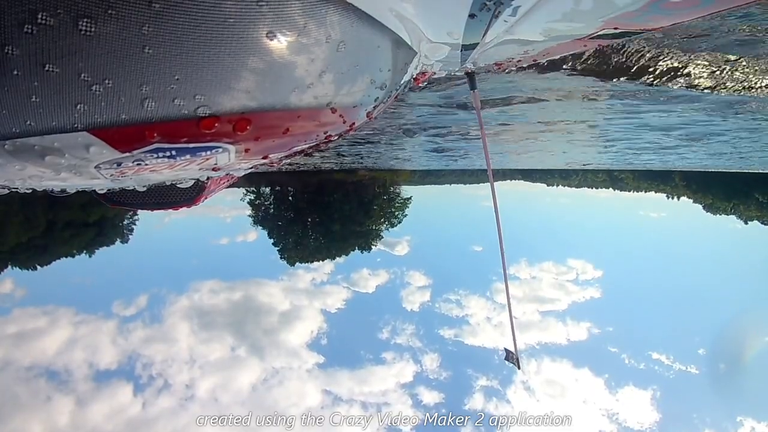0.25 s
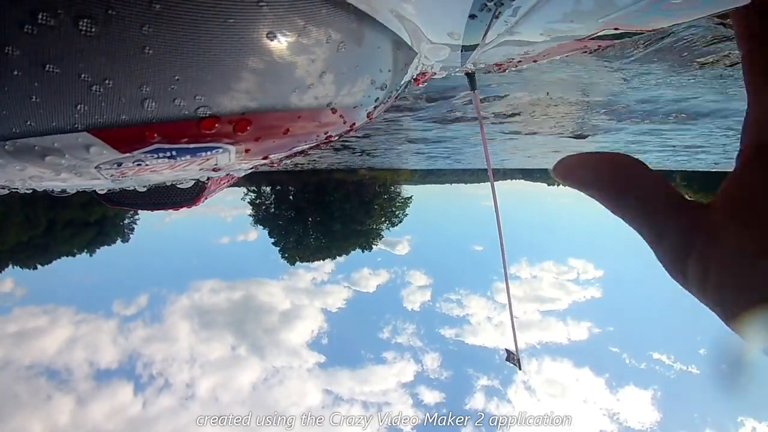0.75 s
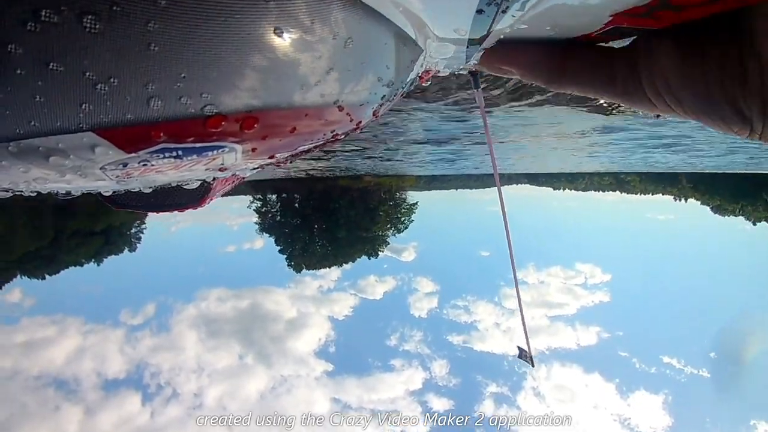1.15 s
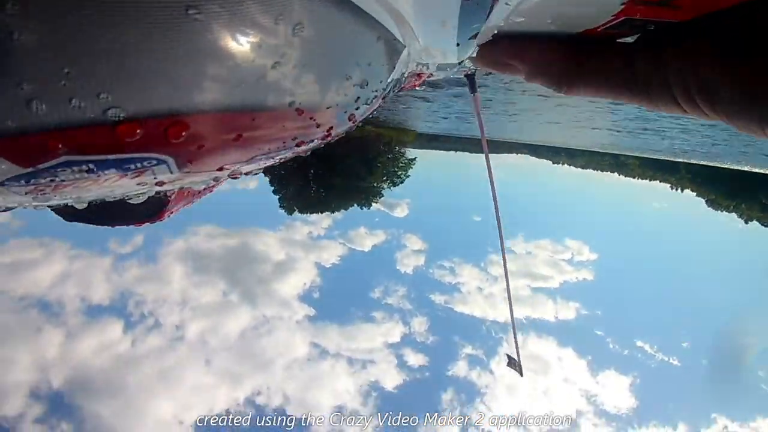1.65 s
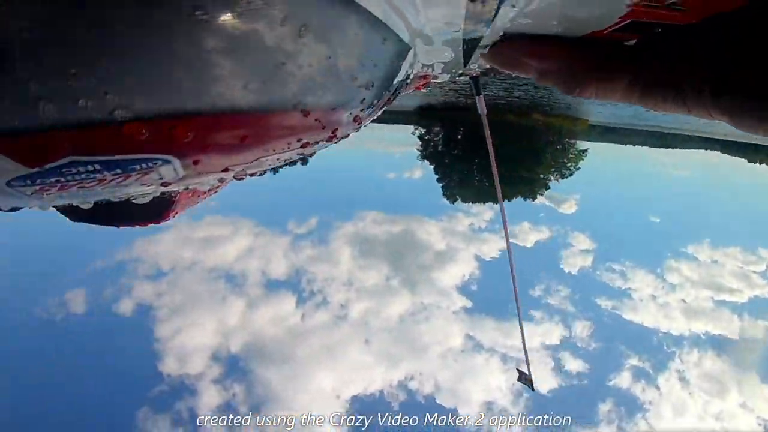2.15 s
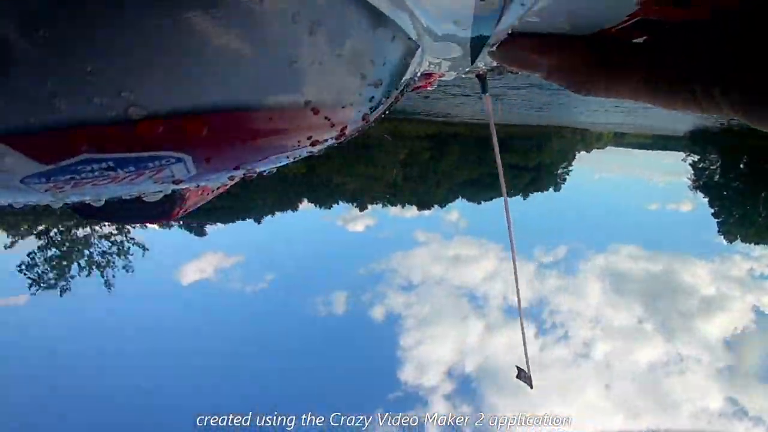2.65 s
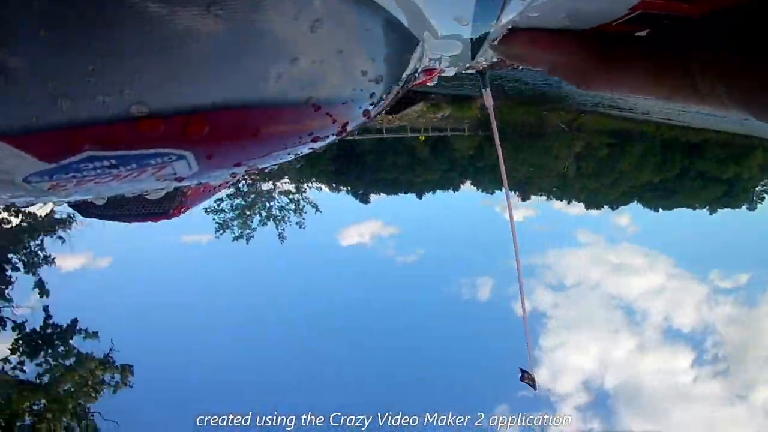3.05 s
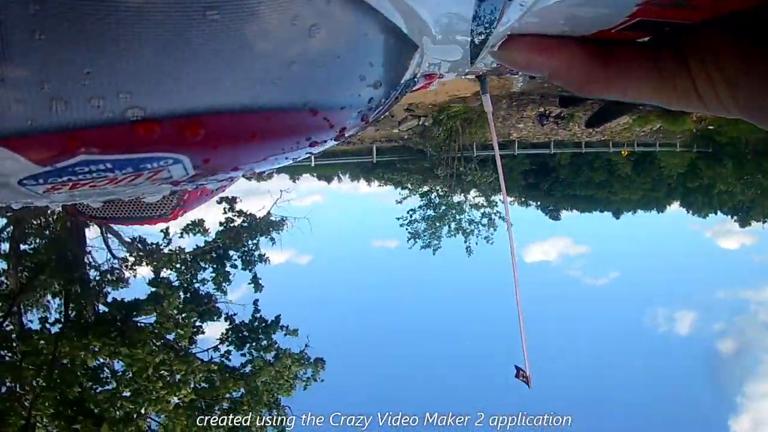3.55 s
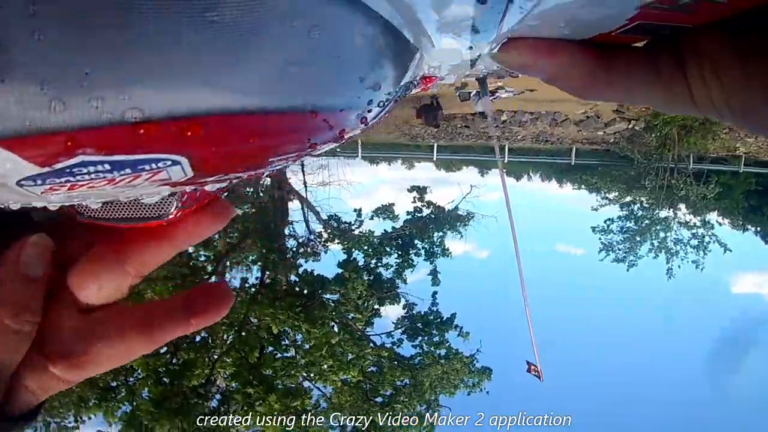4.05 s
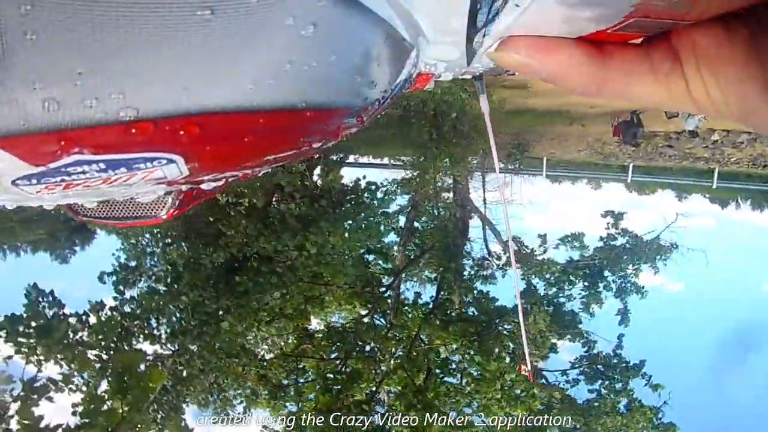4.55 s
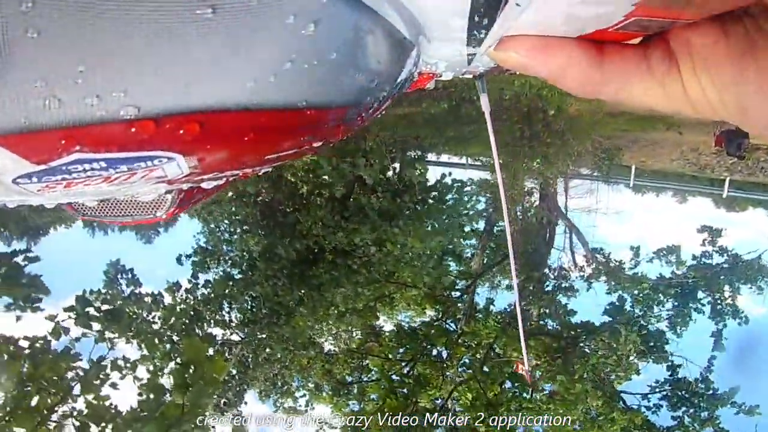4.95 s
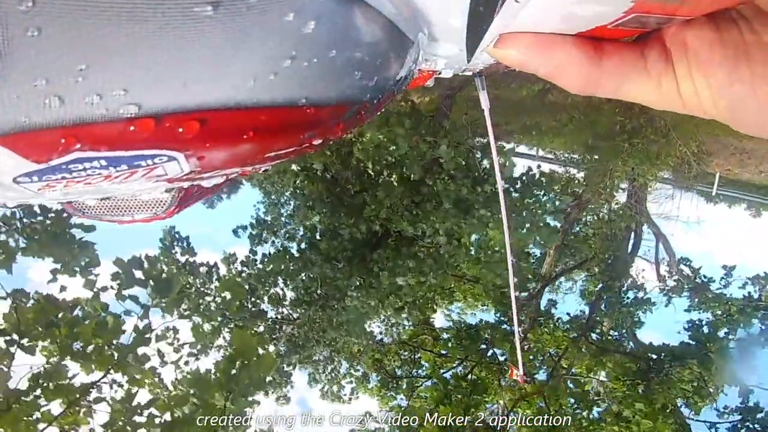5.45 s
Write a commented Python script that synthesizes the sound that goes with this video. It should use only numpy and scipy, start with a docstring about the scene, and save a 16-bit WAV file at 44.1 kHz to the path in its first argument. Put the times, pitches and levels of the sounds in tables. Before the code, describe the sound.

Close, muffled sound from a microphone sealed in a plastic case on a small boat's hull. Water slaps, gulps and gurgles with hard knocks, building to a surging, crackling hand slide just after one second. One heavy bump follows near two seconds, then drips, sparse taps and low sway over faint steady wash, ending in a cluster of dull clunks.

```python
"""Handling a small model boat, heard from its hull

The microphone sits in a camera in a waterproof case on the hull: water slaps, gulps and gurgles (ringing air
pockets) and a hand slides over it (surging, crackling friction). The case knocks and the loose camera clunks
(ringing modes) while the hollow hull booms and sways (low modes), over a steady muffled wash (shaped noise)."""
import sys
import numpy as np
from scipy import signal
from scipy.fft import rfft, irfft, next_fast_len
from scipy.io import wavfile
from scipy.ndimage import uniform_filter1d

SR = 44100
rng = np.random.default_rng(int(sys.argv[2]) if len(sys.argv) > 2 else 0)


def dump(signal):
    """Clip the signal to [-1, 1] and save it as 16-bit WAV at the path in sys.argv[1]."""
    limited = np.clip(np.atleast_2d(signal).T, -1, 1)
    pcm = np.round(limited * 32767).astype(np.int16)
    wavfile.write(sys.argv[1], SR, pcm)


N = 251361
TIME = np.arange(N) / SR
PADDED = next_fast_len(N, True)
FREQ = np.fft.rfftfreq(PADDED, 1 / SR)

# The case knocks on the hull. Each row: start in seconds, level in dB, hardness as a tilt in dB per octave.
KNOCK_ROWS = [(0.4274, -41, -2.5), (0.4585, -31.5, -10), (0.848, -33.5, 1.5), (0.861, -35.5, -2),
              (0.9125, -40, -0.5), (0.991, -42, 2), (1.132, -31.5, 0.5), (1.156, -32.5, -5.5),
              (1.237, -26.5, -1.5), (1.2545, -29.5, -2), (1.269, -34.5, 0), (1.3085, -38, 1.5),
              (1.371, -30, -2), (1.381, -33, 2), (2.0461, -43, -1), (2.0765, -37.5, 0.5),
              (2.2216, -51.5, 3), (2.564, -67, 18), (2.6015, -45, 0.5), (3.1455, -34, 1),
              (3.8835, -35, 0.5), (3.889, -36, -1), (4.078, -43, 0.5), (4.173, -45, -0.5),
              (5.6198, -42, 0.5)]
# The loose camera rocks in its mount. Each row: start in seconds, relative level in dB, hardness as a tilt
# in dB per octave.
CLUNK_ROWS = [(3.0018, -40.5, -2), (3.0411, -42, 0), (3.137, -31.5, 0), (4.828, -40.5, -4.5),
              (4.868, -50, -14), (5.0205, -44.5, -1), (5.1559, -50, -6), (5.2903, -36, -4), (5.302, -34, 1),
              (5.321, -44, 1), (5.33, -39.5, 0.5), (5.403, -37, -1), (5.455, -35.5, -8), (5.49, -44.5, -18),
              (5.5737, -37, -3)]
# Ringing of the plastic case. Each row: pitch in Hz, relative level in dB, time to fall 60 dB in seconds.
CASE_MODES = [(266, 7, 0.01), (529.5, 5, 0.038), (711, -5, 0.097), (910, 12.5, 0.0065), (1142, -6.5, 0.12),
              (1489, 7.5, 0.02), (1500, -19, 0.045), (2070, -22, 0.085), (1930, -20.5, 0.021),
              (2420, -36, 0.0031), (3485, -5.5, 0.017), (3950, 5, 0.0027), (3830, -45.5, 0.013),
              (5040, -39, 0.022), (6400, -39, 0.013)]
# Ringing of the hollow hull. Each row: pitch in Hz, relative level in dB, time to fall 60 dB in seconds.
HULL_MODES = [(36.5, 4.5, 0.59), (71.5, 6, 0.31), (108.1, 6.5, 0.2), (130.4, -3.5, 0.27), (179, -7.5, 0.46)]


def amp(db):
    """Decibels to gain."""
    return 10 ** (np.asarray(db) / 20)


def evened(x):
    """Scales to rms 1."""
    return x / np.sqrt(np.mean(x ** 2) + 1e-20)


def crested(x, size):
    """Scales so that the loudest stretch of that many samples has rms 1."""
    return x / np.sqrt(uniform_filter1d(x ** 2, size, mode="constant").max() + 1e-20)


def read(points, hz):
    """Reads a spectrum on a log-frequency axis."""
    f, value = np.transpose(points)
    return np.interp(np.log(hz + 1), np.log(f + 1), value)


def octaves(hz):
    """Octaves from 1 kHz, held below 300 Hz and above 6500 Hz."""
    return np.log2(np.clip(hz, 300, 6500) / 1000)


def coloured(x, db):
    """Filters by a gain given at every frequency."""
    return irfft(rfft(x, PADDED) * amp(db), PADDED)[:N]


def wander(hz):
    """Slow chance of rms 1, fading out smoothly around and above hz."""
    spectrum = rfft(rng.standard_normal(PADDED)) * np.exp(-np.minimum(FREQ / hz, 10) ** 2)
    return evened(irfft(spectrum, PADDED)[:N])


def add(mix, s, sound):
    """Mixes a sound in at a time in seconds."""
    part = mix[max(round(s * SR), 0):][:len(sound)]
    part += sound[:len(part)]


def ring(modes, t, gain_db=0, detune=1):
    """Sum of dying sines, one for each mode."""
    hz, db, t60 = np.transpose(modes)
    sines = np.sin(2 * np.pi * (hz * detune)[:, None] * t)
    return amp(db + gain_db) @ (amp(-60 * t / t60[:, None]) * sines)


def sized_births(per_s, size_db, limit):
    """Chance starts at a mean rate, with levels spread upwards as far as size_db * limit."""
    return (rng.random(N) < per_s / SR) * amp(size_db * np.minimum(rng.exponential(1, N), limit))


def pockets(rows, level_db, rise_s, octaves_per_s):
    """Trapped air rings, rising in pitch as its pocket shrinks or falling as it opens."""
    out, t = np.zeros(N), np.arange(SR // 4) / SR
    for s, db, hz, t60 in rows:
        phase = 2 * np.pi * np.cumsum(hz * 2 ** (octaves_per_s * t)) / SR
        pocket = -np.sin(phase) * amp(-60 * t / t60)
        add(out, s, amp(db + level_db) * pocket * (1 - np.exp(-t / rise_s)))
    return out


def slaps():
    """Water slaps the wet hull, each slap ringing a hollow pocket of air that shrinks."""
    # Each row: start in seconds, relative level in dB, starting pitch in Hz, time to fall 60 dB in seconds.
    slap_rows = [(0.427, -20, 540, 0.043), (0.43, -32.5, 756, 0.029), (0.449, -26.5, 570, 0.018),
                 (0.535, -44, 430, 0.063), (0.831, -43, 938, 0.074), (0.857, -37, 620, 0.05),
                 (1.032, -34.5, 525, 0.042), (1.073, -37, 450, 0.078), (1.131, -15.5, 518, 0.029),
                 (1.152, -35, 1126, 0.05), (1.16, -26, 530, 0.055), (1.194, -32, 595, 0.05),
                 (1.8975, -34.5, 440, 0.06), (1.8975, -10.5, 309, 0.012), (3.884, -29, 607, 0.044),
                 (4.077, -36.5, 960, 0.022), (4.173, -44, 940, 0.045), (4.186, -46, 704, 0.038),
                 (4.866, -47.5, 317, 0.042), (5.021, -43.5, 490, 0.033), (5.302, -32, 890, 0.021),
                 (5.403, -39, 560, 0.03)]
    return pockets(slap_rows, level_db=-1.5, rise_s=0.00069, octaves_per_s=1.9)


def gulps():
    """Water gulps under the hull, falling in pitch as the hollow opens."""
    # Each row: start in seconds, relative level in dB, starting pitch in Hz, time to fall 60 dB in seconds.
    gulp_rows = [(0.425, -40.5, 127.6, 0.7), (0.463, -42, 228, 0.092), (0.843, -33, 252, 0.17),
                 (0.85, -29, 126, 0.2), (0.887, -31, 200, 0.16), (0.925, -40.5, 297, 0.1),
                 (1.085, -39, 193.3, 0.13), (1.135, -25, 174, 0.11), (1.19, -33.5, 218, 0.12),
                 (3.149, -24.5, 189, 0.076), (4.085, -46, 114, 0.15), (4.118, -41.5, 193.2, 0.31),
                 (5.52, -42, 251, 0.094)]
    return pockets(gulp_rows, level_db=0.5, rise_s=0.0022, octaves_per_s=-5)


def bump(rub, splash_db=-27, splash_s=0.0095, hiss_db=-46, hiss_s=0.009):
    """The hull lands squarely on the case: a steep push relaxes at once, with a short noisy splash."""
    start_s, level_db, contact_s, top_hz = 1.8975, -12.5, 0.00102, 2200
    t = np.arange(SR // 16) / SR
    push = signal.lfilter(*signal.butter(5, top_hz, fs=SR), np.exp(-t / contact_s))
    splash = amp(splash_db) * evened(rub[:SR // 16]) * np.exp(-t / splash_s)
    hiss = amp(hiss_db) * rng.standard_normal(len(t)) * np.exp(-t / hiss_s)  # faint treble noise
    out = np.zeros(N)
    add(out, start_s, amp(level_db) * (splash + hiss - push))
    return out


def knocks(blows, modes, level_db=0, spread_db=4.5, detune=0.048, crack_db=-4, soft_hz=2600,
           dent_db=-2, dent_s=0.001):
    """Each blow rings the modes, a little differently by where it lands, with a brief gritty crack."""
    grit_db, crack_s, crack_hz = 0.1, 0.0027, 1800
    hiss_db, hiss_s = -42, 0.019
    crest = 176  # samples, 4 ms
    out, t = np.zeros(N), np.arange(SR // 8) / SR
    hz = np.transpose(modes)[0]
    wall = signal.butter(8, 7200, fs=SR, output="sos")  # the case lets little top treble through
    for s, db, tilt in blows:
        place, shift = rng.standard_normal((2, len(hz)))
        grit, noise = rng.standard_normal((2, len(t)))
        body = ring(modes, t, tilt * octaves(hz) + spread_db * place, 1 + detune * shift)
        # a hard blow cracks louder and brighter
        crack_band = [380, np.clip(crack_hz * amp(tilt), 1300, 6500)]
        crack_filter = signal.butter(4, crack_band, "band", fs=SR, output="sos")
        crack = signal.sosfilt(crack_filter, grit * np.sqrt(t) * np.exp(-t / crack_s))
        # the wall dents once and springs back
        dent = (1 - t / (3 * dent_s)) * t * np.exp(-t / dent_s)
        blow = crested(body, crest) + amp(crack_db + grit_db * tilt) * crested(crack, crest)
        blow = blow + amp(dent_db) * crested(dent, crest)
        # a soft blow leaves out the treble
        soft = signal.butter(3, np.clip(soft_hz * amp(tilt), 1400, 6500), fs=SR)
        blow = signal.lfilter(*soft, signal.sosfilt(wall, blow))
        # faint treble noise around the blow
        hiss = amp(hiss_db) * noise * np.sqrt(t / hiss_s) * np.exp(-t / hiss_s)
        add(out, s, amp(db + level_db) * (hiss - crested(blow, crest)))
    return out


def clunks():
    """The loose camera rocks in its mount, each dull blow ringing the mount's modes."""
    # Each row: pitch in Hz, relative level in dB, time to fall 60 dB in seconds.
    mount_modes = [(532, 5, 0.033), (760, 0.5, 0.015), (922, 7, 0.011), (1130, -7, 0.018),
                   (1410, -10.5, 0.059)]
    return knocks(CLUNK_ROWS, mount_modes, level_db=-6, spread_db=5.5, detune=0.033, crack_db=-8.5,
                  soft_hz=1910, dent_db=-10, dent_s=0.0017)


def friction(slips_per_s=2500, size_db=3, catch_hz=160, catch_db=1.6, smooth=0.59, ring_share=0.32):
    """Tiny slips and drops come in clumps and sound through the case."""
    # Colour of rubbing. Each row: frequency in Hz, relative level in dB per Hz.
    rub_colour = [(150, -32), (260, -11), (520, 2.5), (750, -9), (950, -1.5), (1220, -23.5), (1550, 0.5),
                  (1900, -2.5), (2500, -16), (2900, -29), (3400, -18.5), (4200, -17.5), (4900, -30),
                  (6500, -33), (7600, -49), (15000, -53)]
    slips = sized_births(slips_per_s, size_db, 4) * rng.choice([-1, 1], N)
    drive = evened(slips) + smooth * rng.standard_normal(N)
    drive = drive * amp(catch_db * wander(catch_hz))
    case_ring = np.diff(ring(CASE_MODES, np.arange(SR // 8) / SR))
    ringing = signal.fftconvolve(drive, case_ring)[:N]
    ringing = signal.lfilter(*signal.butter(2, 2200, fs=SR), ringing)
    return evened(coloured(drive, read(rub_colour, FREQ))) + ring_share * evened(ringing)


def judder(rub, per_s=72, jitter=0.3, fade_s=0.019, spread_db=3, steady=0.9, wall_hz=5200, groan_db=1.5):
    """Wet skin sticks and slips unevenly: gives the bursts of rubbing and a resonant groan."""
    # Broad resonances that colour the slide. Each row: pitch in Hz, relative level in dB, time to fall
    # 60 dB in seconds.
    slide_modes = [(199, 2.5, 0.35), (405, -13, 0.14), (537, 5.5, 0.093), (1470, -11, 0.06),
                   (1624, -15, 0.06), (1860, -1.5, 0.068), (2020, 6, 0.042)]
    t = np.arange(SR // 4) / SR
    turns = np.cumsum(per_s * np.exp(jitter * wander(60))) / SR
    slips = np.diff(np.floor(turns), prepend=0) * amp(spread_db * rng.standard_normal(N))
    bursts = steady + signal.fftconvolve(slips, np.exp(-t / fade_s))[:N]
    groan = signal.fftconvolve(bursts * rng.standard_normal(N), ring(slide_modes, t))[:N]
    wall = signal.butter(3, wall_hz, fs=SR)  # the case dulls the slips
    return signal.lfilter(*wall, rub * bursts), amp(groan_db) * evened(groan)


def crackle(per_s=520, low_hz=1300, high_hz=4300, cycles=7, size_db=3, tilt=-7, count=24):
    """The squeezed film of water bursts in separate little pops at a spread of pitches."""
    out, t = np.zeros(N), np.arange(SR // 40) / SR
    for hz in np.geomspace(low_hz, high_hz, count):
        pops = sized_births(per_s / count, size_db, 2)
        pop = np.sin(2 * np.pi * hz * t) * np.exp(-hz * t / cycles) * (1 - np.exp(-hz * t))
        out += amp(tilt * octaves(hz)) * signal.oaconvolve(pops, pop)[:N]
    return evened(out)


def slide(rub, crackle_db=-8.0):
    """The hand closes on the hull in one long surging slide, brighter as the grip tightens, then rests."""
    start_s, end_s, attack_s, release_db_per_s = 1.228, 1.3946, 0.0062, 600
    level_db, tilt_start, tilt_end = -39.5, 0.39, 3.5  # tilts in dB per octave
    # Surges of the hand. Each row: time in seconds, pressure in dB.
    surge_rows = [(1.232, 2), (1.26, -0.5), (1.276, -5), (1.292, 4), (1.302, -0.5), (1.314, 3.5),
                  (1.326, 1), (1.342, 3), (1.364, -1.5), (1.383, 1), (1.4, -0.5)]
    bursts, groan = judder(rub)
    dull = evened(coloured(bursts, tilt_start * octaves(FREQ)))
    bright = evened(coloured(bursts, tilt_end * octaves(FREQ)))
    grip = np.clip((TIME - start_s) / (end_s - start_s), 0, 1)
    attack = np.clip((TIME - start_s) / attack_s, 0, 1)
    release_db = release_db_per_s * np.clip(TIME - end_s, 0, 1)
    pressure_db = np.interp(TIME, *np.transpose(surge_rows))
    wet = (1 - grip) * dull + grip * bright + groan + amp(crackle_db) * crackle()
    return wet * attack * amp(level_db + pressure_db - release_db)


def strokes(rub, level_db=-1, edge_s=0.015, taper=0.11):
    """Water and fingers slide on the hull in short stretches, each of its own strength and brightness."""
    # Each row: start in seconds, end in seconds, relative level in dB, tilt in dB per octave.
    stroke_rows = [(0.409, 0.469, -46, -6), (0.463, 0.567, -58, 0), (0.555, 0.679, -53, -3),
                   (0.71, 0.751, -60, -1), (0.737, 0.884, -51.5, -4.5), (0.824, 0.875, -48, 1.5),
                   (0.992, 1.015, -51.5, 2.5), (0.999, 1.136, -52.5, -0.5), (1.07, 1.116, -68.5, 13),
                   (1.097, 1.255, -51, -1), (1.405, 1.441, -48.5, 0.5), (1.731, 1.829, -56, -2.5),
                   (2.053, 2.126, -58, -0.5), (2.217, 2.227, -50.5, 6), (2.491, 2.552, -65, 4.5),
                   (2.594, 2.623, -53.5, 2.5), (2.888, 2.969, -66, -0.5), (3.146, 3.18, -49.5, -3),
                   (3.876, 3.901, -45.5, -0.5), (3.956, 4.22, -61, -1.5), (4.397, 4.464, -58, -9),
                   (5.28, 5.353, -67.5, 4.5)]
    out = np.zeros(N)
    for start, end, db, tilt in stroke_rows:
        part = rub[round(start * SR):][:max(round((end - start) * SR), 256)]
        part = part * signal.windows.tukey(len(part), taper + 2 * edge_s * SR / len(part))
        tilt_db = tilt * octaves(np.fft.rfftfreq(len(part), 1 / SR))
        part = irfft(rfft(part) * amp(tilt_db), len(part))
        add(out, start, amp(db + level_db) * evened(part))
    return out


def booms(blows, spread_octaves=0.2):
    """Each blow makes the nearest panel boom, then the whole hull give, as pushes for thuds()."""
    # Panel, then hull. Each row: delay in seconds, level against the blow in dB, central pitch in Hz.
    boom_rows = [(0.003, -2.5, 167.6), (0.009, -1.5, 86.2)]
    db_per_hardness = 0.9  # raises hard blows, lowers soft ones
    limit_db = -42  # the stiff hull is pushed no harder than this
    pushes = []
    for s, db, tilt in blows:
        weight_db = db + db_per_hardness * tilt
        places = 2 ** (spread_octaves * rng.standard_normal(2))  # pitch depends on where the blow lands
        for (delay_s, boom_db, hz), place in zip(boom_rows, places):
            pushes.append((s + delay_s, min(weight_db + boom_db, limit_db), hz * place))
    return pushes


def thuds(level_db=-1, cycles=2.5, ring_db=-8, reach=0.34):
    """A push flexes the hull for a cycle or two and leaves the nearest modes ringing."""
    # Further low pushes on the hull, alone or under a blow. Each row: start in seconds, relative level in dB,
    # pitch in Hz.
    thud_rows = [(0.923, -29, 78.5), (1.07, -30, 55.7), (1.223, -24, 71), (1.25, -37, 194),
                 (1.305, -24, 70), (1.452, -34, 130), (1.736, -34.5, 61.7), (1.8995, -25.5, 182),
                 (1.903, -32.5, 62.3), (2.922, -41, 56.6), (3.05, -41, 80), (3.155, -31.5, 48.5),
                 (3.888, -33, 111), (4.049, -37.5, 39.4), (4.479, -37, 126), (4.875, -41.5, 70),
                 (5.03, -42.5, 64), (5.305, -38.5, 37), (5.338, -42, 114), (5.467, -38, 80.3)]
    out, t = np.zeros(N), np.arange(SR // 2) / SR
    mode_hz = np.transpose(HULL_MODES)[0]
    for s, db, hz in [*thud_rows, *booms([*KNOCK_ROWS, *CLUNK_ROWS])]:
        flex = np.sin(2 * np.pi * hz * t) * np.exp(-hz * t / cycles)
        tail = ring(HULL_MODES, t, -6 * abs(np.log2(mode_hz / hz)) / reach)
        push = (flex + amp(ring_db) * tail) * (1 - np.exp(-5 * hz * t))
        add(out, s, amp(db + level_db) * crested(push, size=440))
    return out


def sway(flex_hz=35, top_hz=230, lump_db=2):
    """Uneven pressure of water and hand keeps the hull flexing and rumbling in its modes."""
    # The hull shakes. Each row: time in seconds, slow flexing in dB, ringing in dB.
    sway_rows = [(0.0, -62, -60.5), (0.24, -61.5, -63), (0.83, -74, -48.5), (1.06, -39.5, -41),
                 (1.269, -37.5, -32.5), (1.48, -54.5, -60), (1.73, -56.5, -55), (1.92, -42.5, -42.5),
                 (2.13, -48, -47), (2.3, -48.5, -53), (2.68, -54.5, -58.5), (2.97, -51, -54),
                 (3.13, -52, -47.5), (3.26, -51.5, -57.5), (3.87, -56, -59.5), (4.05, -43.5, -47),
                 (4.46, -49, -57.5), (5.7, -46.5, -48)]
    s, flexing_db, ringing_db = np.transpose(sway_rows)
    hull_ring = np.diff(ring(HULL_MODES, np.arange(SR // 2) / SR))
    rumble = signal.fftconvolve(rng.standard_normal(N), hull_ring)[:N]
    rumble = signal.lfilter(*signal.butter(2, top_hz, fs=SR), rumble)
    rumble = evened(rumble * amp(lump_db * wander(16)))
    flex_band = signal.butter(2, [17, flex_hz], "band", fs=SR, output="sos")
    flex = evened(signal.sosfilt(flex_band, rng.standard_normal(N)))
    return rumble * amp(np.interp(TIME, s, ringing_db)) + flex * amp(np.interp(TIME, s, flexing_db))


def gurgle(level_db=-1, per_s=200, low_hz=380, high_hz=1400, cycles=5, glide=3, size_db=3, count=24):
    """Many small pockets of air ring for a few cycles, rising in pitch; the small ones are fainter."""
    # Water gurgling along the hull. Each row: time in seconds, relative level in dB.
    gurgle_rows = [(0.38, -65), (0.44, -44), (0.49, -57), (0.65, -58), (0.72, -80), (0.84, -42),
                   (0.89, -55.5), (1.1, -51), (1.17, -43), (1.39, -44), (1.45, -61)]
    out, t = np.zeros(N), np.arange(SR // 16) / SR
    for hz in np.geomspace(low_hz, high_hz, count):
        births = sized_births(per_s / count, size_db, 3)
        bubble = np.sin(2 * np.pi * hz * t * (1 + glide * t)) * np.exp(-hz * t / cycles)
        bubble = bubble * (1 - np.exp(-hz * t)) ** 2
        out += signal.oaconvolve(births, bubble)[:N] / np.sqrt(hz)
    course_db = np.interp(TIME, *np.transpose(gurgle_rows), left=-120, right=-120)
    return evened(out) * amp(level_db + course_db)


def drips(rub, ring_s=0.035, splash_db=-9, splash_s=0.0044):
    """Drops land near the case, each with a brief splash and one small ringing bubble."""
    # Each row: start in seconds, relative level in dB, starting pitch in Hz.
    drip_rows = [(0.585, -50, 1130), (0.616, -49.5, 1840), (0.652, -54, 592), (0.667, -45.5, 1414),
                 (0.797, -62, 1060), (2.002, -50.5, 770), (2.025, -58.5, 735), (2.099, -56, 910),
                 (2.18, -51.5, 960), (2.193, -48, 814), (2.298, -54, 1530), (2.325, -50.5, 936),
                 (2.456, -53, 1430), (2.462, -50.5, 470), (2.945, -58, 1220), (3.272, -67, 1570),
                 (3.901, -49.5, 1550), (3.985, -54, 1520), (3.991, -56, 460), (4.002, -54, 1500),
                 (4.069, -56, 550), (4.119, -65, 603), (4.288, -56, 453), (4.44, -64, 503),
                 (5.511, -55, 600)]
    splashes, t = np.zeros(N), np.arange(SR // 16) / SR
    for s, db, hz in drip_rows:
        add(splashes, s, amp(db + splash_db) * t / splash_s * np.exp(1 - t / splash_s))
    bubbles = [(*row, ring_s) for row in drip_rows]
    return splashes * evened(rub) + pockets(bubbles, level_db=0.5, rise_s=0.00048, octaves_per_s=4.6)


def spray(ring_s=0.016):
    """Small bright droplets burst on the case, each ringing for a few milliseconds and rising a little."""
    # Each row: start in seconds, relative level in dB, starting pitch in Hz.
    spray_rows = [(0.846, -37, 3800), (0.853, -42, 2650), (0.8543, -49, 4480), (1.0015, -38, 4250),
                  (1.003, -44.5, 3340), (1.009, -49, 4400), (1.086, -52, 3500), (1.093, -57, 5500),
                  (2.077, -49.5, 3640), (2.22, -54, 3420), (2.5515, -63, 6400), (2.5633, -60, 6650),
                  (4.293, -59, 4200)]
    droplets = [(*row, ring_s) for row in spray_rows]
    return pockets(droplets, level_db=-3.5, rise_s=0.0003, octaves_per_s=4.5)


def trickle(level_db=-70, per_s=600, low_hz=1000, high_hz=2000, cycles=2.1, size_db=3, count=20):
    """Water runs off the wet hull in faint, soft drops at a spread of pitches."""
    out, t = np.zeros(N), np.arange(SR // 20) / SR
    for hz in np.geomspace(low_hz, high_hz, count):
        drops = sized_births(per_s / count, size_db, 2)
        plip = np.sin(2 * np.pi * hz * t) * hz * t * np.exp(-2 * hz * t / cycles)
        out += signal.oaconvolve(drops, plip)[:N]
    return amp(level_db) * evened(out)


def rippled(wash, ripple_db=1.53, drift_db=2.03):
    """Wavelets brighten patches of the wash for a moment, and broader patches drift slowly."""
    z = signal.stft(wash, nperseg=512)[2]
    quick, slow = rng.standard_normal((2, *z.shape))
    # smoothed over frequency, then over time
    quick = evened(uniform_filter1d(uniform_filter1d(quick, size=6, axis=0), size=7, axis=1))
    slow = evened(uniform_filter1d(uniform_filter1d(slow, size=22, axis=0), size=36, axis=1))
    return signal.istft(z * amp(ripple_db * quick + drift_db * slow), nperseg=512)[1][:N]


def air(level_db=-65.5):
    """Steady open air and far water: flickering noise, muffled and coloured by the closed case."""
    # Open air and far water. Each row: frequency in Hz, relative level in dB per Hz.
    air_colour = [(12, -48), (20, -4.5), (74, -15.5), (115, -10.5), (202, -14), (252, 4), (767, -3.5),
                  (857, -5), (1200, -35), (1580, -4.5), (1820, -21.5), (1970, -17.5), (2840, -32.5),
                  (3260, -30), (15500, -40)]
    # Hum of the closed case. Each row: centre in Hz, width in Hz, lift or dip in dB.
    hum_rows = [(119, 11, -5.5), (186, 18, -7.5), (353, 51, -2), (1420, 110, 11.5), (1906, 85, 12.5),
                (2940, 1900, 8.5), (4250, 2100, 5.5)]
    colour_db = read(air_colour, FREQ)
    for hz, width, db in hum_rows:
        colour_db = colour_db + db / (1 + (2 * (FREQ - hz) / width) ** 2)
    wash = rippled(coloured(rng.standard_normal(N), colour_db))
    # the level is set by what lies above 300 Hz
    body = np.std(signal.sosfilt(signal.butter(4, 300, "high", fs=SR, output="sos"), wash))
    flicker_db = 1.1 * wander(40) + 0.6 * wander(5)
    return wash / body * amp(level_db + flicker_db)


def scene():
    """Everything reaches the one microphone through the case."""
    rub = friction()
    big_bubbles = gurgle(level_db=-3.5, per_s=22, low_hz=182, high_hz=363.4, cycles=14.0, glide=3.22,
                         size_db=2.5, count=8)
    water = slaps() + gulps() + gurgle() + big_bubbles + drips(rub) + spray() + trickle()
    blows = knocks(KNOCK_ROWS, CASE_MODES) + bump(rub) + clunks()
    hull = thuds() + sway()
    hand = strokes(rub) + slide(rub)
    return (water + blows + hull + hand + air())[None]


def record(dry):
    """The recorder's band limit, a steep low-pass at 15.7 kHz."""
    low_pass = signal.firwin(511, 15700, window=("kaiser", 9), fs=SR)
    return signal.oaconvolve(dry, low_pass[None], "same")


dry = scene()
out = record(dry)
dump(out)
```